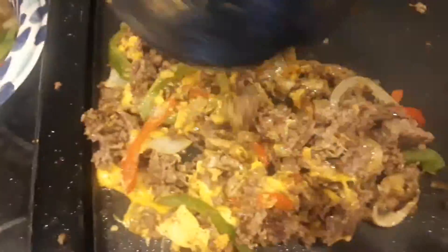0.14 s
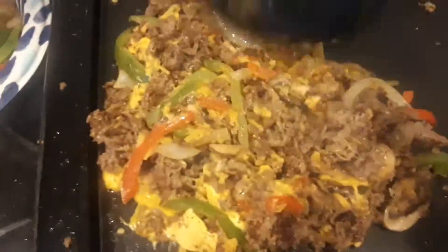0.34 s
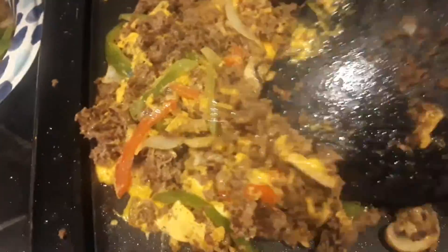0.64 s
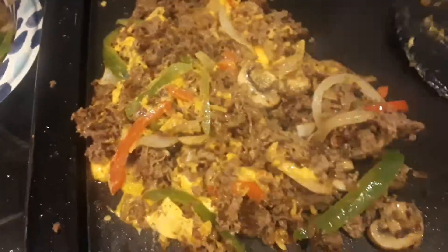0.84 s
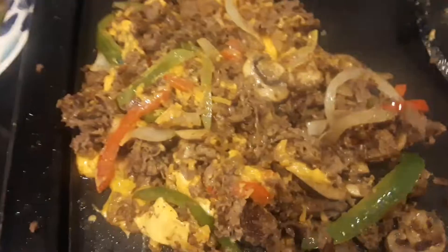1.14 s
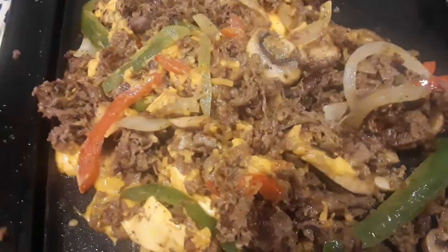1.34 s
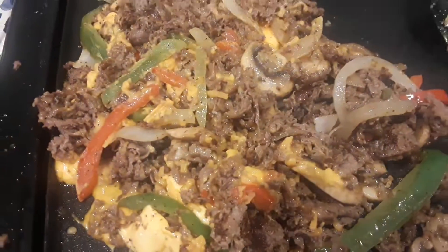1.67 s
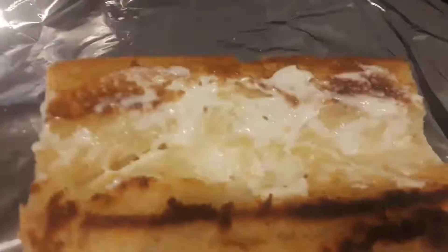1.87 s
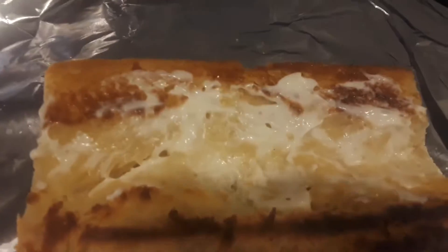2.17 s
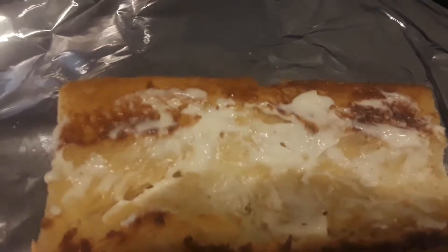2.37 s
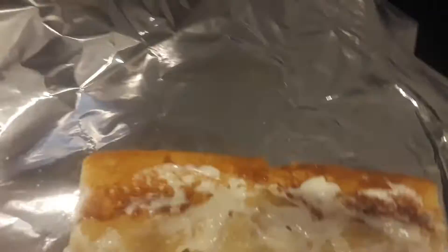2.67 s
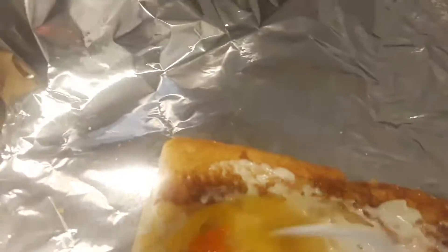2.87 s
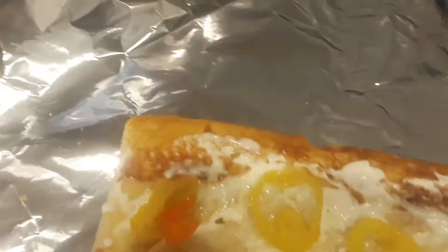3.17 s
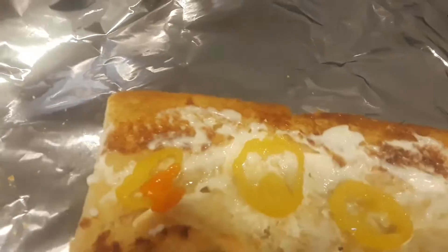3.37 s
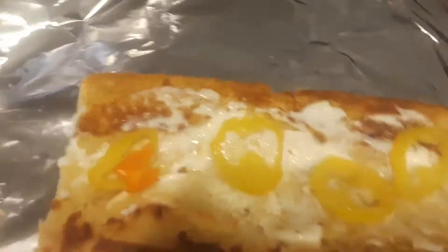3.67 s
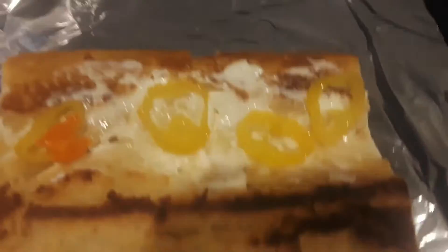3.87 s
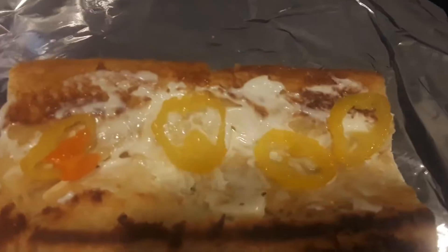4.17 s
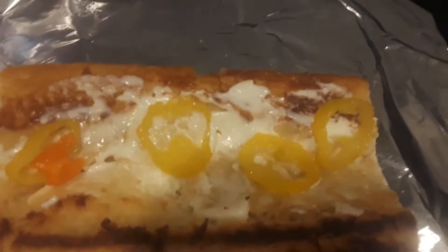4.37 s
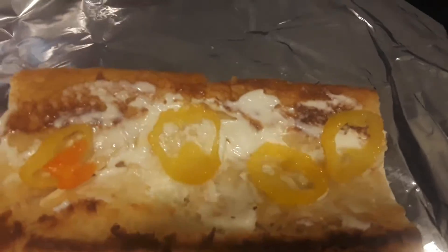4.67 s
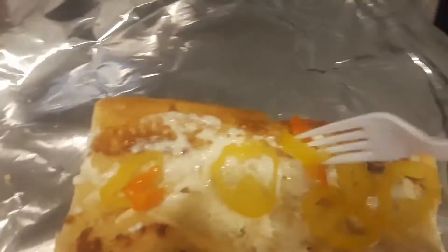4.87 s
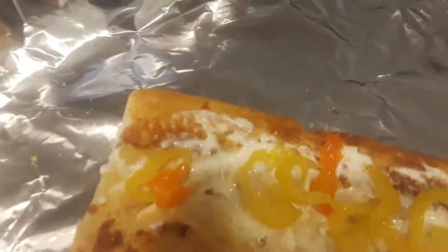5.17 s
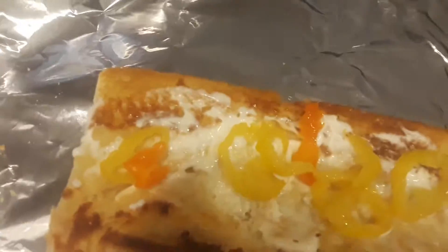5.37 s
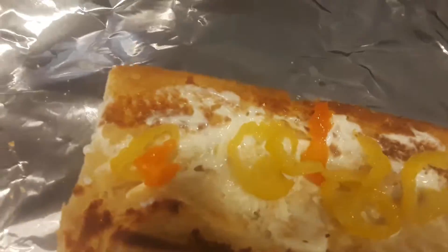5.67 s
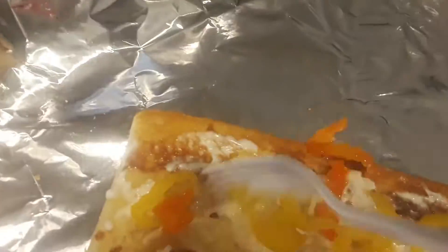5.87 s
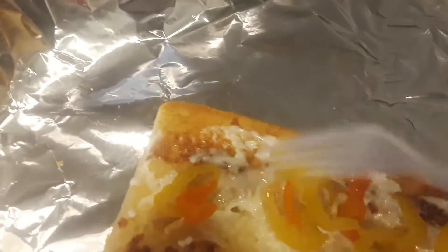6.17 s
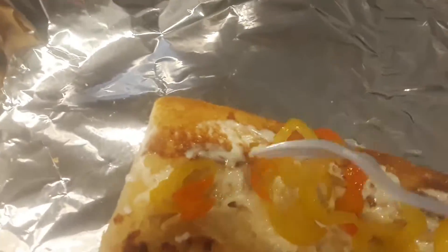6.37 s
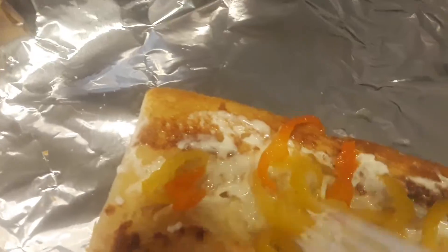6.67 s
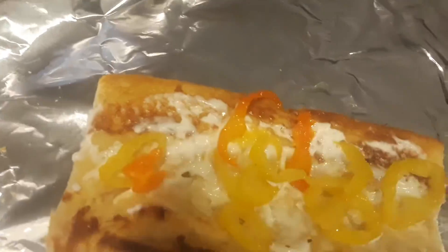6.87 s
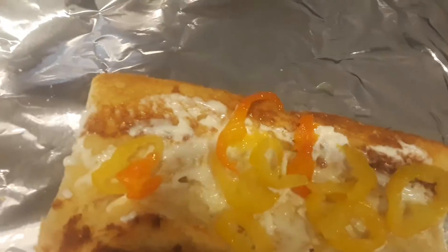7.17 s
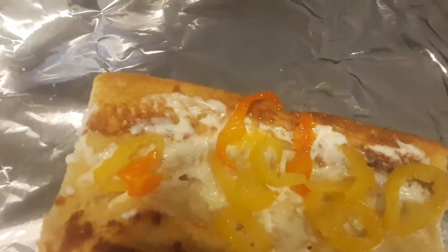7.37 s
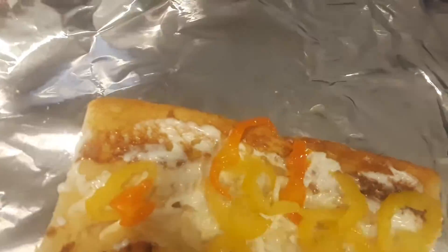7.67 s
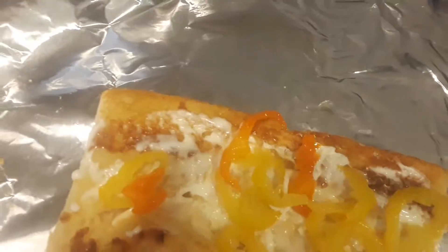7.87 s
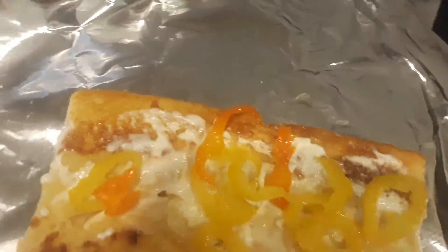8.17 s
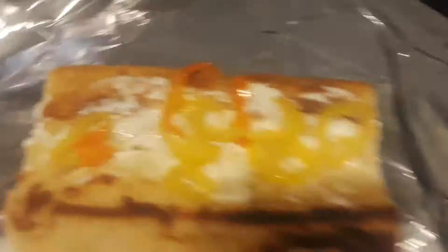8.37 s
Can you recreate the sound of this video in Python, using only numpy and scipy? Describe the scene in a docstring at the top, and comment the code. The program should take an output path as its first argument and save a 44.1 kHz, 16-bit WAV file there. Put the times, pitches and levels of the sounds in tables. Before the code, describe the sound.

Very close, meat and vegetables sizzle and spit on a hot griddle while a spatula presses with soft thuds and bursts of steam, over a low fan hum. Suddenly the sizzle drops to a faint distant hiss at a counter. Foil ticks and rustles, a plastic fork clinks lightly, and fingers bump the hand-held device, with sharp hollow knocks near the middle and towards the end.

```python
"""Griddle and counter, hand-held phone

Two places. Close over a hot griddle, meat and vegetables sizzle as crackle and bubbles while a spatula pushes
them about, under fan rush and motor hum. At 1.8 s the scene cuts to the counter: the frying is a faint hiss,
a plastic fork lays peppers on bread in foil (ringing tines, rustles, ticks), and the phone is bumped and
rubbed so that its case rings. Its limiter ducks everything after the hardest knocks.
"""
import sys
import numpy as np
from scipy import signal
from scipy.fft import rfft, irfft, next_fast_len
from scipy.io import wavfile
from scipy.ndimage import uniform_filter1d, minimum_filter1d

SR = 44100
rng = np.random.default_rng(int(sys.argv[2]) if len(sys.argv) > 2 else 0)


def master(y):
    """Save y as 16-bit WAV."""
    cut = np.clip(np.atleast_2d(y).T, -1, 1)
    pcm = np.round(cut * 32767)  # scale
    wavfile.write(sys.argv[1], SR, pcm.astype(np.int16))


N = 376613
T = np.arange(N) / SR
CUT_S = 1.8  # from the griddle to the counter

# Fan: spectrum of its rushing air at each place: pitch_hz, level_db
AIR_AT_GRIDDLE = [(25, -13), (60, -10), (100, 16.5), (170, 4), (330, 8.5), (390, 11.5), (480, 5),
                  (560, 0.5), (640, -10.5), (900, -4.5), (1500, -9), (4000, -19.5)]
AIR_AT_COUNTER = [(25, -8.5), (50, -7.5), (90, 9), (160, 6), (350, 5.5), (520, 3.5), (610, -6.5), (850, -8),
                  (1100, -7), (2200, -13.5), (4000, -31.5), (12000, -26.5)]
# Duct resonances: pitch_hz, width_hz, griddle_db, counter_db
DUCT_RESONANCES = [(423.1, 31, -54.5, -51), (533.6, 34, -56, -62.5), (790, 150, -65, -57),
                   (912, 42, -60, -60.5)]
# Weaker motor tones, relative to the hum at each place: pitch_hz, griddle_db, counter_db
MOTOR_TONES = [(213.4, -55, -24.5), (229, -53, -23.5), (253.3, -51, -29.5), (264.4, -18, -46),
               (344, -29, -25), (424.8, -12.5, -20)]
HUM_HZ, OVERTONE_DB = 120, -23  # twice the mains rate, and its second harmonic
HUM_AT_GRIDDLE_DB, HUM_AT_COUNTER_DB = -33, -30.5
MOTOR_WANDER = 0.01124  # rms share by which the motor speed wanders

# Spectrum of the frying from the counter: pitch_hz, level_db
FAR_FRYING_COLOUR = [(700, -23), (1500, 4.5), (2400, 8), (3400, 2), (4400, 5), (5800, -2), (7000, 0.5),
                     (8000, 2), (9200, -8), (12000, -1), (16000, -5)]
# The far hiss starts softer after the cut and rises as the phone's noise suppression eases
FAR_DB, FAR_START_DB, FAR_RISE_S = -48.5, -5.5, 3  # settled level, start against it, time constant

# Phone case, low modes before a grip detunes them: pitch_hz, t60_s, level_db
CASE_LOW_MODES = [(294, 0.024, -1), (465, 0.051, -7), (566, 0.045, 0.5), (805, 0.031, 4), (930, 0.056, 3.5),
                  (1137, 0.031, -1), (1380, 0.04, 1), (1554, 0.028, -2), (1740, 0.022, -1.5),
                  (1890, 0.028, -0.5), (2047, 0.028, 2.5), (2380, 0.013, -0.5), (2670, 0.018, -7.5),
                  (3580, 0.0032, -15)]
# Phone case, thin high modes when left free: pitch_hz, t60_s, level_db
CASE_HIGH_MODES = [(2974, 0.17, 2), (3230, 0.076, -16.5), (4510, 0.37, -13.5), (7050, 0.07, -13.5),
                   (8900, 0.12, -25), (10020, 0.14, -19.5), (14400, .06, -26)]
# Fingers judder on the case: start_s, length_s, level_db, centre_hz, fall_db_per_octave, high_modes_db
BUMPS = [(2.067, 0.01, -39.5, 1110, 25, -24), (2.24, 0.013, -35, 950, 23, -25),
         (2.515, 0.022, -41.5, 850, 14, -22), (3.219, 0.016, -17, 830, 7, -23),
         (3.936, 0.022, -32.5, 950, 35, -20), (4.045, 0.027, -26, 935, 18, -18),
         (4.21, 0.029, -30, 925, 3, -6), (4.376, 0.025, -40, 900, 20, -20),
         (4.416, 0.028, -24.5, 950, 5.5, -20), (4.423, 0.016, -33, 290, 18, -32),
         (4.536, 0.037, -18, 1510, 4, -7), (5.443, 0.018, -34, 895, 9, -5),
         (5.593, 0.014, -33.5, 830, 26, -21), (6.904, 0.019, -33, 930, -1, -12),
         (7.312, 0.04, -13, 1200, -0.5, -6.5), (7.729, 0.016, -21.5, 1000, 2, -18),
         (7.899, 0.034, -22, 800, -1, -5), (7.926, 0.021, -24, 2200, 0, 0),
         (8.127, 0.01, -35, 1240, 8, -22)]
# Knocks on the case: start_s, level_db, tilt_db_per_octave
KNOCKS = [(3.2283, -11, 1), (3.845, -17, 2.5), (4.4305, -22, -7), (4.5405, -5, 2), (4.5507, -5.5, -2.5),
          (4.558, -2.5, 3), (7.3126, -8, -1), (7.3158, 5, 0.5), (7.3347, 1, -0.5), (7.7352, -16, 3),
          (7.9232, 1, 3), (8.1224, -11, -0.5)]
# Dull crack of the contact: pitch_hz, level_db
KNOCK_COLOUR = [(120, -18.5), (400, -3.5), (850, 2), (1400, -6), (2200, -2.5), (3200, -19.5), (3900, -33),
                (8000, -31), (16000, -38)]
# High modes sing until a finger lands: start_s, free_s, level_db, lowest_mode_hz, tilt_db_per_octave
SINGS = [(4.5398, 0.026, -22, 3040, 3), (7.3144, 0.029, -11, 3008, -5.5), (7.9252, .011, -25, 3130, -3)]
GRIP_DETUNE, GRIP_DB = 0.0067, 2  # rms scatter of low-mode pitch (share) and level from grip to grip
GRIP_DAMPING = 0.22  # share of the high modes' ring time left under a finger
KNOCK_BODY_DB = -5  # ring of the low modes against the crack
CONTACT_HZ = 4200  # a fingertip is soft: its knock holds little above this
SING_ATTACK_S, SING_STOP_S = 0.002, 0.032  # swell, and t60 once the finger has landed

# Sharp ticks of creased foil, off to the right: start_s, level_db (right side)
FOIL_TICKS = [(2.574, -19.5), (2.765, -20), (2.793, -20), (3.044, -23), (3.995, -20), (4.252, -23),
              (4.837, -20), (4.997, -16.5), (5.289, -19.5), (5.386, -22), (6.011, -37), (6.044, -21),
              (6.38, -23), (6.429, -17.5), (6.755, -19), (8.153, -16), (8.302, -23)]
# Spectrum of a foil tick: pitch_hz, level_db
TICK_COLOUR = [(1000, -7), (3000, 0), (7500, -1), (9500, -6), (13000, -3), (16000, -2)]
TICK_LEFT_DB = -7  # left side against the right

# Light clinks of the fork: start_s, level_db, tilt_db_per_octave
CLINKS = [(4.107, -12, 4.5), (4.149, -28, -4), (6.855, -15.5, 17), (7.019, -29, -12)]
# Modes of a clink: pitch_hz, t60_s, level_db
CLINK_MODES = [(2360, 0.011, 8.5), (2800, 0.018, 8.5), (3010, 0.044, 12), (4040, 0.029, -7),
               (5193, 0.04, 1.5), (7060, 0.02, -17.5)]
# The fork drags and its tines squeak: start_s, length_s, level_db, tilt_db_per_octave
SQUEAKS = [(3.818, 0.025, -45.5, 9), (4.389, 0.025, -41, 8), (5.534, 0.026, -43, 13), (7.695, .03, -50, 12),
           (7.103, 0.073, -50.5, -22), (8.029, 0.024, -46, -21)]
# Modes of the tines: pitch_hz, t60_s, level_db
TINE_MODES = [(3006, 0.096, 5), (5400, 0.051, -5.5)]
# Foil and crust rustle and scrape: start_s, length_s, level_db, centre_hz, fall_db_per_octave, resonance_db
RUSTLES = [(1.836, 0.0071, -28, 13200, 6, -3), (1.978, 0.043, -39.5, 1970, 11, -21),
           (2.091, 0.11, -51, 2380, 16, -7), (2.168, .008, -41, 1890, 11, 3),
           (2.316, 0.014, -37.5, 1520, 6, -2), (2.632, 0.035, -21.5, 2540, 4.5, -17),
           (2.667, 0.014, -36.5, 2000, 13, -15), (2.816, 0.027, -35, 2110, 14, -1),
           (2.839, 0.036, -36.5, 2800, 9, -22), (2.907, 0.011, -37.5, 2390, 2, 2),
           (3.105, 0.01, -32.5, 9300, 20, -15), (3.231, 0.022, -34, 3230, 9, -7),
           (3.256, 0.031, -33, 3970, 3, -16), (3.284, 0.027, -29, 2950, 2.5, -12),
           (3.31, 0.035, -41, 1490, 8, -15), (3.356, 0.035, -40.5, 1410, 8, -8),
           (3.888, 0.027, -36, 2100, 9.5, -5), (4.616, 0.0099, -42.5, 5500, 14, -15),
           (5.632, 0.025, -41.5, 6130, 4, -21), (5.843, 0.024, -23.5, 4940, 2, -15),
           (6.121, 0.02, -38.5, 2420, 6, -19), (6.28, 0.028, -41, 5950, -0.5, -20),
           (7.038, 0.0075, -40, 5100, 16, -15), (7.069, 0.045, -40, 2000, 9, -5),
           (7.927, 0.0084, -22.5, 8900, -4.5, -21), (8.136, 0.029, -43, 2560, -3, -1),
           (8.354, 0.0057, -37, 4170, 9, -10), (8.385, 0.19, -50, 2540, 18, 3)]
# Spectrum of foil and crust: pitch_hz, level_db
RUSTLE_COLOUR = [(50, -21), (200, 15), (700, 9.5), (1700, 3.5), (3000, 3), (4500, 1.5), (7500, 3),
                 (9500, -2), (12000, 4), (16000, -4)]
BOUNCE_S, BOUNCE_DB = 0.0041, -2.5  # the tines touch once more after each clink
RUSTLE_RING_S = 0.029  # t60 of the patch that is scraped

# Spectrum of the frying close by: pitch_hz, level_db
FRYING_COLOUR = [(350, -28), (600, -13), (634, -9), (688, -1.5), (801, -15), (881, -7), (1730, -3),
                 (2340, 3), (3430, -2), (3990, 1), (6120, -6.5), (7940, -4), (9240, -11), (13200, -7),
                 (16000, -13)]
# Loudest single bursts of fat: start_s, level_db, centre_hz
SPITS = [(0.049, -6.5, 11000), (.166, -8, 9000), (.254, -8.5, 2940), (0.324, -14, 4630), (.326, -8, 5100),
         (0.439, -14.5, 2700), (0.493, -9.5, 5600), (.538, -16, 3650), (0.562, -7.5, 4400),
         (.583, -12, 3300), (.699, -10.5, 9000), (.81, -16, 3500), (.913, -24, 4000), (.975, -14, 7040),
         (1.069, -17, 6000), (1.159, -15, 2330), (1.184, -12, 3530), (1.266, -14.5, 4580),
         (1.298, -30, 3500), (1.392, -17, 3000), (1.402, -18, 2310), (1.444, -14, 2180),
         (1.671, -16.5, 2340), (1.774, -21, 5500), (1.789, -22, 1990)]
# Fresh juice reaches the hot plate and the frying flares: start_s, hold_s, rise_db
FLARES = [(0.03, 0.6, 2), (1.094, 0.3, 1)]
# Spatula presses wet food on the plate: start_s, length_s, steam_db, thud_db, thud_tilt_db_per_octave
STROKES = [(0.057, 0.054, -43, -40, -3), (0.17, 0.026, -31, -27, 4), (0.282, 0.057, -35, -42.5, 10),
           (0.369, 0.042, -56, -33, -1), (0.471, 0.028, -44, -40, -1), (0.534, 0.047, -30.5, -42.5, 3),
           (0.633, 0.029, -29, -52, -2), (0.713, 0.028, -32.5, -61, 0), (0.82, 0.017, -34, -30.5, -6.5)]
# Modes of the plate: pitch_hz, t60_s, level_db
PLATE_MODES = [(265, 0.02, 1.5), (397, 0.027, -2), (545, 0.059, 6.5), (700, 0.016, 2.5), (895, 0.02, 5),
               (990, .015, -2), (1230, 0.025, -5)]
FRYING_DB, FLARE_ATTACK_S, FLARE_RELEASE_S = -34.5, 0.021, 0.043  # resting gain, rise and decay times
SPIT_FALL_DB = 6.4  # per octave away from the centre
CLICK_S, CLICK_DB = 1.2, -7  # one crisp broadband click during the frying
CUT_FADE_S = 0.015  # the frying dies away over the cut

# How the two microphone ports hear each group: pitch_hz, left_minus_right_db, side_gain_db
NEAR_PORTS = [(100, 7, -13), (500, 2, -7), (850, 3, -1.5), (1400, 5.5, 1), (2520, 8.5, -2.5), (4940, 7, 2),
              (7150, 7.5, -1.5), (10900, -1, -7)]
CASE_PORTS = [(300, 2.3, 5), (850, 1.7, -5.5), (1400, 2.3, -1), (2920, 9.7, -8), (7300, 5, 0)]
ROOM_PORTS = [(120, 2.5, -5), (240, 0.5, -8.5), (423, -0.5, -4), (786, 1.5, 1), (1350, 2, 4),
              (2130, 2.5, -2.5), (5360, -2, 1.5), (7800, 0, -6), (11900, -6, -5)]
PORT_LAG = 10  # samples by which the right port hears later
CEILING, TOP_HZ = 0.9, 15900  # limiter peak (full scale is 1) and upper band edge


def undb(db):
    """Turn decibels into gain."""
    return 10 ** (np.asarray(db) / 20)


def unit(x):
    """Scale to rms 1."""
    return x / np.sqrt(np.mean(x ** 2))


def add(track, start_s, x):
    """Mix a sound into a two-channel track at a time."""
    i = max(int(start_s * SR), 0)
    track[:, i:i + x.shape[1]] += x[:, :N - i]


def response(points, tilt_db=0, size=4096):
    """Minimum-phase impulse response of unit energy for a spectrum, tilted in dB per octave."""
    hz, db = np.transpose(points)
    octave = np.log2(np.maximum(np.fft.rfftfreq(size, 1 / SR), 1))
    gain = undb(np.interp(octave, np.log2(hz), db + tilt_db * np.log2(hz)))
    # folding the cepstrum forward makes the response causal
    cepstrum = irfft(np.log(gain))
    cepstrum[1:size // 2] *= 2
    cepstrum[size // 2 + 1:] = 0
    h = irfft(np.exp(rfft(cepstrum)))
    return h / np.linalg.norm(h)


def through(x, h):
    """Pass a two-channel sound through an impulse response."""
    return signal.oaconvolve(x, h[None], axes=1)[:, :x.shape[1]]


def cut(x, kind, edge_hz):
    """Steep "low"-pass or "high"-pass."""
    return signal.sosfilt(signal.butter(4, edge_hz, kind, fs=SR, output="sos"), x)


def wander(per_s):
    """Smooth random drift with a given number of free points per second, rms 1."""
    return unit(signal.resample(rng.standard_normal(int(per_s * N / SR)), N))


def ring(modes, size=5000):
    """Decaying modes, energy set by their dB; neighbours swing in opposite directions."""
    t = np.arange(size) / SR
    x = np.zeros(size)
    for k, (hz, t60, db) in enumerate(modes):
        decay = undb(db - 60 * t / t60) / np.sqrt(t60)
        x += (-1) ** k * decay * np.sin(2 * np.pi * hz * t)
    return x


def tilted(modes, tilt_db, about_hz):
    """Modes made brighter or duller by dB per octave."""
    return [(hz, t60, db + tilt_db * np.log2(hz / about_hz)) for hz, t60, db in modes]


def narrowed(colour, centre_hz, fall_db):
    """A spectrum that falls away on both sides of a centre, in dB per octave."""
    return [(hz, db - fall_db * abs(np.log2(hz / centre_hz))) for hz, db in colour]


def pops(count, per_s, spread_db):
    """Clicks at random samples, of random sign and exponentially spread level in dB."""
    chance = rng.random(count)
    sign = rng.choice([-1, 1], count)
    size = rng.exponential(size=count)
    return (chance < per_s / SR) * sign * undb(spread_db * np.minimum(size, 6))


def ports(clicks, wet_db, t60):
    """Clicks at two microphone ports: the right hears later, and each click has a short scatter in the treble."""
    keep = undb(-120 / (t60 * SR))  # energy kept per sample
    energy = signal.lfilter([0, 1 - keep], [1, -keep], clicks ** 2 + 1e-18)
    scatter = np.sqrt(energy) * rng.standard_normal((2, len(clicks)))
    scatter = signal.sosfilt(signal.butter(2, 1100, "high", fs=SR, output="sos"), scatter)
    late = np.pad(clicks, (PORT_LAG, 0))[:-PORT_LAG]
    return np.array([clicks, late]) + undb(wet_db) * scatter


def burst(length, h, per_s, spread_db, wet_db, t60, skew=0.59, size=12000):
    """A swell of tiny contacts into a response, rms 1 over its length; a skew under 1 brings the peak forward."""
    progress = np.minimum(np.arange(size) / (length * SR), 1)
    swell = np.sin(np.pi * progress ** skew)
    x = through(ports(pops(size, per_s, spread_db) * swell, wet_db, t60), h)
    return x * np.sqrt(2 * length * SR / (np.sum(x ** 2) + 1e-18))


def tap(h, wet_db, t60, size=6000):
    """One click into a response whose peak is scaled to 1, with scatter at the ports."""
    return through(ports(signal.unit_impulse(size), wet_db, t60), h / np.abs(h).max())


def shade(x, table):
    """Direction and width of a sound at the microphone ports, frequency by frequency."""
    size = next_fast_len(N + 4096)
    hz, *columns = np.transpose(table)
    balance_db, side_db = (np.interp(np.fft.rfftfreq(size, 1 / SR), hz, c) for c in columns)
    left, right = rfft(x, size)
    side = (left - right) * undb(side_db)
    pair = (left + right + np.outer([1, -1], side)) / 2
    return irfft(pair * undb(np.outer([0.5, -0.5], balance_db)), size)[:, :N]


def air(colour, db, duct_dbs):
    """Rushing air is shaped noise; the duct adds narrow bands of noise at its resonances."""
    x = undb(db) * through(rng.standard_normal((2, N)), response(colour))
    for (hz, width, *_), duct_db in zip(DUCT_RESONANCES, duct_dbs):
        peak = signal.iirpeak(hz, hz / width, SR)
        band = signal.lfilter(*peak, rng.standard_normal((2, N)))
        x += undb(duct_db) * unit(signal.lfilter(*peak, band))
    return x


def fan():
    """The motor hums at twice the mains rate under the rush of air; weaker tones follow its wandering speed."""
    _, _, griddle_duct, counter_duct = np.transpose(DUCT_RESONANCES)
    griddle_air = air(AIR_AT_GRIDDLE, db=-40.5, duct_dbs=griddle_duct)
    counter_air = air(AIR_AT_COUNTER, db=-41.2, duct_dbs=counter_duct)
    at_griddle = T < CUT_S
    rush = np.where(at_griddle, griddle_air, counter_air)
    hum = np.sin(2 * np.pi * HUM_HZ * T)
    hum += undb(OVERTONE_DB) * np.sin(2 * np.pi * 2 * HUM_HZ * T)
    turning = np.cumsum(1 + MOTOR_WANDER * wander(20)) / SR
    for hz, griddle_db, counter_db in MOTOR_TONES:
        gain = np.where(at_griddle, undb(griddle_db), undb(counter_db))
        hum += gain * np.sin(2 * np.pi * (hz * turning + rng.random()))
    hum_gain = undb(np.where(at_griddle, HUM_AT_GRIDDLE_DB, HUM_AT_COUNTER_DB))
    return rush + np.sqrt(2) * hum * hum_gain


def far_griddle():
    """From the counter the frying is a soft hiss of noise with fine, short ticks."""
    ticks = unit(ports(pops(N, per_s=2600, spread_db=3.6), wet_db=14, t60=0.012))
    heard = undb(3.5) * ticks + undb(-1.5) * rng.standard_normal((2, N))
    # the phone's noise suppression eases after the cut
    suppression = np.exp(-np.maximum(T - CUT_S, 0) / FAR_RISE_S)
    gain = undb(FAR_DB + FAR_START_DB * suppression)
    return through(heard, response(FAR_FRYING_COLOUR)) * gain * (T >= CUT_S)


def gripped_case(centre_hz, fall_db, high_db):
    """Ring of the case under one grip: low modes favoured round a centre, high modes damped by the fingers."""
    hz, t60, db = np.transpose(CASE_LOW_MODES)
    detune, uneven = rng.standard_normal((2, len(hz)))
    gripped_hz = hz * (1 + GRIP_DETUNE * detune)
    gripped_db = db + GRIP_DB * uneven - fall_db * abs(np.log2(hz / centre_hz))
    high = np.array(CASE_HIGH_MODES) * [1, GRIP_DAMPING, 1]
    return ring(zip(gripped_hz, t60, gripped_db)) + undb(high_db) * ring(high)


def singing_case(free_s, lowest_hz, tilt_db):
    """The high modes ring cleanly, then are choked by a finger."""
    modes = np.array(CASE_HIGH_MODES) * [lowest_hz / CASE_HIGH_MODES[0][0], 1, 1]
    x = ring(tilted(modes, tilt_db, about_hz=lowest_hz))
    t = T[:len(x)]
    choke = undb(-60 * np.maximum(t - free_s, 0) / SING_STOP_S)
    return x * np.minimum(t / SING_ATTACK_S, 1) * choke


def handling():
    """Fingers judder on the case, each touch reaching its own share of the modes; knocks crack and make it sing."""
    x = np.zeros((2, N))
    for s, length, db, centre_hz, fall_db, high_db in BUMPS:
        case = gripped_case(centre_hz, fall_db, high_db)
        add(x, s, undb(db) * burst(length, case, per_s=3300, spread_db=3.5, wet_db=-6, t60=0.062))
    body = ring(CASE_LOW_MODES)
    for s, db, tilt_db in KNOCKS:
        crack = response(KNOCK_COLOUR, tilt_db, size=len(body))
        knock = crack + undb(KNOCK_BODY_DB) * body / np.linalg.norm(body)
        add(x, s, undb(db) * tap(cut(knock, "low", CONTACT_HZ), wet_db=-10.5, t60=0.02))
    for s, free_s, db, lowest_hz, tilt_db in SINGS:
        add(x, s, undb(db) * tap(singing_case(free_s, lowest_hz, tilt_db), wet_db=4, t60=0.0046))
    # so small a body gives no deep bass
    return cut(x, "high", edge_hz=86)


def foil_ticks():
    """A crease of the foil snaps over with one dry click."""
    x = np.zeros((2, N))
    for s, db in FOIL_TICKS:
        add(x, s, undb(db) * tap(response(TICK_COLOUR), wet_db=6.0, t60=0.032))
    return x * undb([[TICK_LEFT_DB], [0]])


def counter():
    """The fork clinks, bounces and squeaks; foil and crust rustle as short crackle with a ring of the patch."""
    x = np.zeros((2, N))
    for s, db, tilt_db in CLINKS:
        clink = ring(tilted(CLINK_MODES, tilt_db, about_hz=3000))
        for at, touch_db in (s, db), (s + BOUNCE_S, db + BOUNCE_DB):
            add(x, at, undb(touch_db) * tap(clink, wet_db=-16, t60=0.011))
    for s, length, db, tilt_db in SQUEAKS:
        tines = ring(tilted(TINE_MODES, tilt_db, about_hz=3000))
        add(x, s, undb(db) * burst(length, tines, per_s=3500, spread_db=1.5, wet_db=5.0, t60=0.028))
    for s, length, db, centre_hz, fall_db, ring_db in RUSTLES:
        crackle = response(narrowed(RUSTLE_COLOUR, centre_hz, fall_db))
        patch = ring([(centre_hz, RUSTLE_RING_S, 0)], size=len(crackle))
        h = crackle + undb(ring_db) * patch / np.linalg.norm(patch)
        rustle = burst(length, h, per_s=5000, spread_db=3.0, wet_db=5.0, t60=0.047, skew=0.57)
        add(x, s, undb(db) * rustle)
    return x


def crisp_click():
    """One crisp broadband click during the frying, with the same spectrum as the rustles."""
    x = np.zeros((2, N))
    add(x, CLICK_S, undb(CLICK_DB) * tap(response(RUSTLE_COLOUR), wet_db=-3, t60=0.02))
    return x


def bubbles(per_s, centre_hz, cycles, spread_db, size=256):
    """Larger bubbles, each dying over a few cycles of its own pitch, at its own place on the plate."""
    x, t = np.zeros((2, N)), np.arange(size) / SR
    for wait, pitch, strength, place in rng.random((int(per_s * CUT_S), 4)):
        hz = centre_hz * 2 ** (2 * pitch - 1)
        pop = np.sin(2 * np.pi * hz * t) * undb(-60 * t * hz / cycles)
        # the place sets the delay at the right port
        pair = np.array([pop, np.roll(pop, int(2 * place * PORT_LAG))])
        gain = undb(-spread_db * np.log(max(strength, 0.03)))
        add(x, wait * CUT_S, pair * gain)
    return x


def frying_level():
    """Gain of the frying: each flare rises, holds and dies back to the resting level."""
    db = FRYING_DB
    for s, hold_s, rise_db in FLARES:
        rise = np.clip((T - s) / FLARE_ATTACK_S, 0, 1)
        fall = np.exp(-np.maximum(T - s - hold_s, 0) / FLARE_RELEASE_S)
        db = db + rise_db * rise * fall
    return undb(db)


def griddle():
    """Steam bubbles burst in the fat; the spatula squeezes out more and thuds on the plate."""
    fizz = response(FRYING_COLOUR)
    flicker = undb(1.47 * wander(88))
    crackle = ports(pops(N, per_s=6500, spread_db=2.5) * flicker, wet_db=7.5, t60=0.0045)
    popping = undb(6.5) * bubbles(per_s=150, centre_hz=3100, cycles=7, spread_db=3.9)
    x = (undb(0.76) * unit(through(crackle, fizz)) + popping) * frying_level()
    for s, db, centre_hz in SPITS:
        spit = response(narrowed(FRYING_COLOUR, centre_hz, SPIT_FALL_DB))
        add(x, s, undb(db) * tap(spit, wet_db=-3.5, t60=0.0083))
    for s, length, steam_db, thud_db, tilt_db in STROKES:
        plate = cut(ring(tilted(PLATE_MODES, tilt_db, about_hz=600)), "high", edge_hz=130)
        steam = burst(length, fizz, per_s=11000, spread_db=5.5, wet_db=25, t60=0.057)
        thud = burst(length, plate, per_s=2300, spread_db=-0.5, wet_db=-6, t60=0.044)
        add(x, s, undb(steam_db) * steam)
        add(x, s, undb(thud_db) * thud)
    return x * np.clip(0.5 + (CUT_S - T) / CUT_FADE_S, 0, 1)


def scene():
    """The room, the phone's own case and the nearby work, each with its own image at the ports."""
    room = shade(far_griddle() + fan(), ROOM_PORTS)
    case = shade(handling(), CASE_PORTS)
    near = shade(griddle() + crisp_click() + counter(), NEAR_PORTS) + foil_ticks()
    return room + case + near


def limiter(x, ceiling, hold_s, release_s):
    """The gain drops at once to keep a peak under the ceiling, holds, then climbs back."""
    need = np.minimum(1, ceiling / (np.abs(x).max(axis=0) + 1e-9))
    hold, release = int(hold_s * SR / 2), int(release_s * SR / 2)
    # the origins make both windows look back only
    held = minimum_filter1d(need, 2 * hold + 1, origin=hold)
    climbing = uniform_filter1d(held, 2 * release + 1, origin=release)
    return x * np.minimum(held, climbing)


def record(dry):
    """The phone limits the peaks and cuts the top."""
    limited = limiter(dry, ceiling=CEILING, hold_s=0.24, release_s=0.1)
    return signal.sosfilt(signal.ellip(10, 0.2, 70, TOP_HZ, fs=SR, output="sos"), limited)


dry = scene()
out = record(dry)
master(out)
```